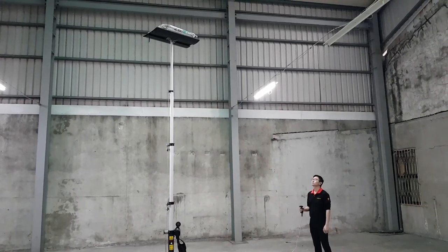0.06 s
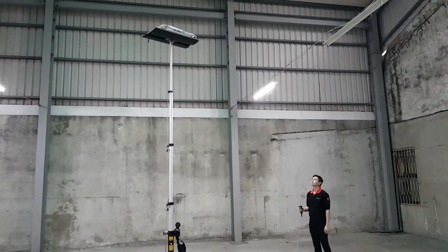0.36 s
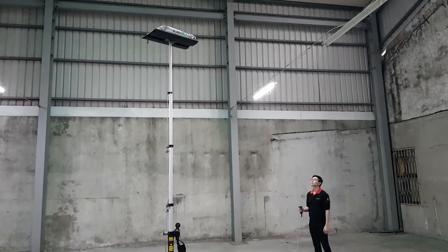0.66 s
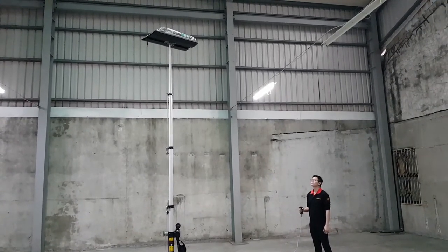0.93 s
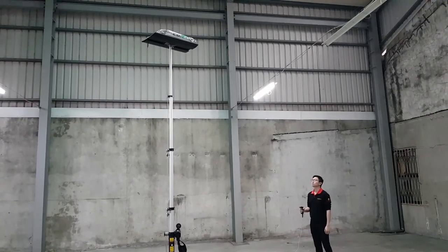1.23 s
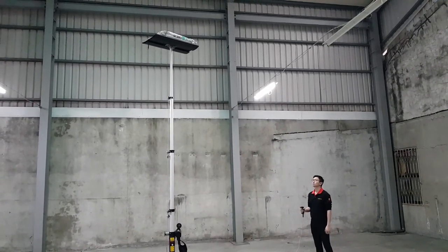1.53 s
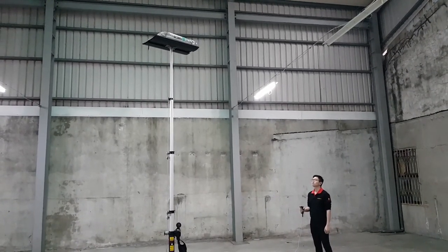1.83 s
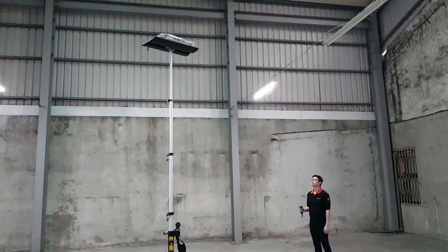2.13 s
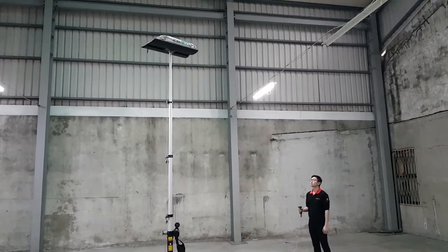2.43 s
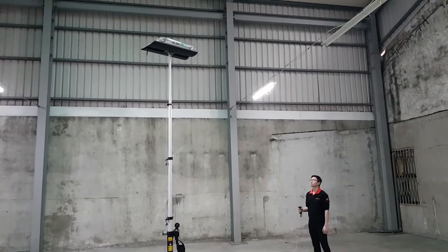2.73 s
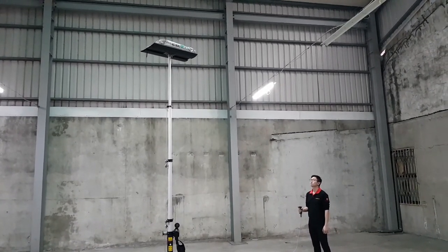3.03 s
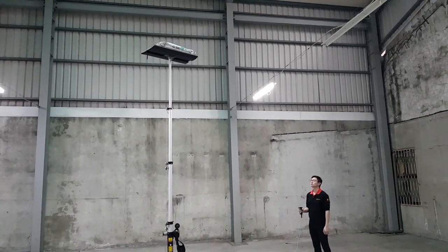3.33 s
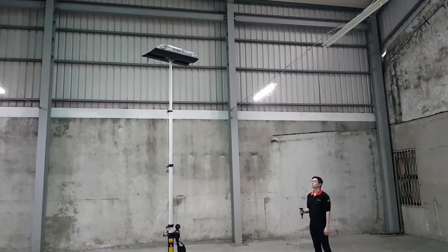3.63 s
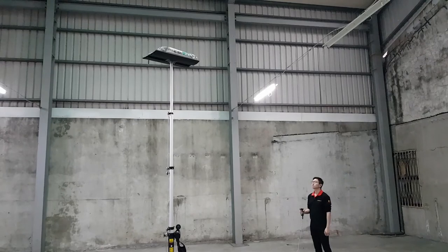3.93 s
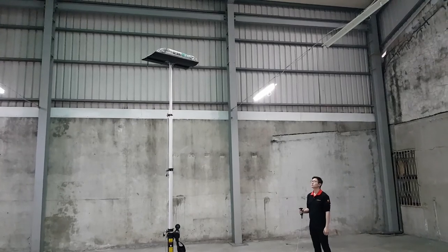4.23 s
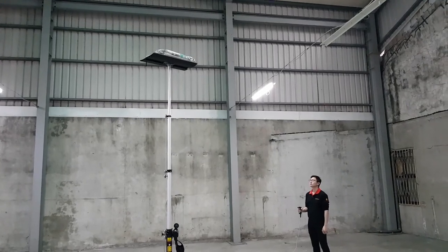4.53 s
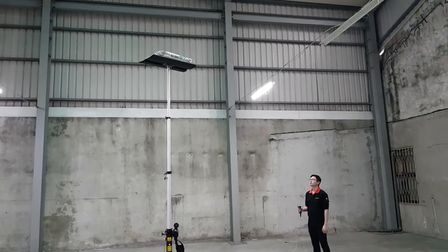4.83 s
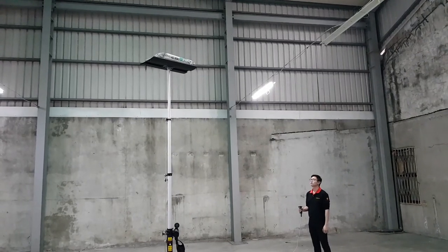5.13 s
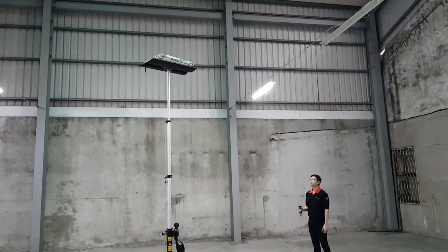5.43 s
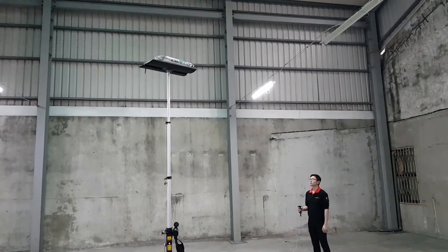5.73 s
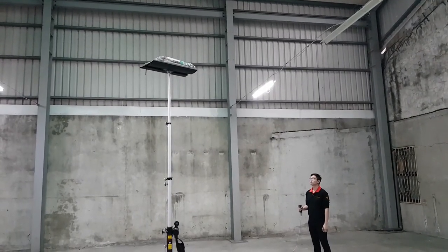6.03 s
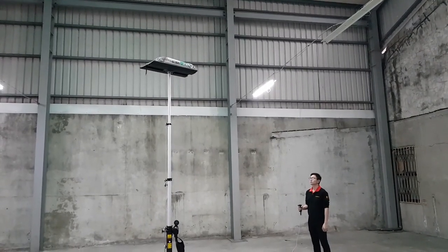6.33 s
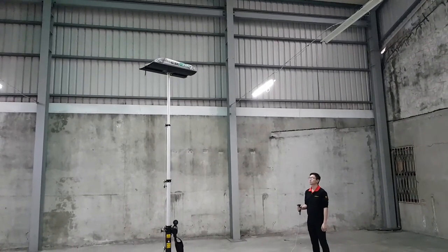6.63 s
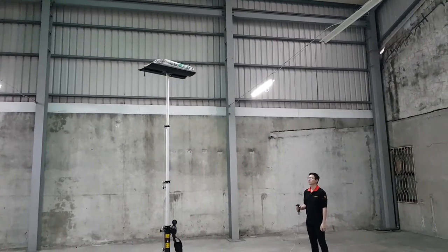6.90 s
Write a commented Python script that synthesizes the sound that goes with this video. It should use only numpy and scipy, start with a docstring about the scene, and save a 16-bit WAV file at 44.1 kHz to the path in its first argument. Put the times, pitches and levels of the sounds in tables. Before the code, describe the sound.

After a moment of quiet room air, an electric winch switches on and climbs quickly to a piercing whine as it lowers a telescopic mast. Its gears rush and hiss, while the sliding mast adds a faint drone and two soft, dull bumps. The whine holds, swelling and fading differently in each ear in the large, echoing warehouse, then falls in pitch as the motor slows near the end.

```python
"""An electric winch lowers a lighting mast in a large, empty warehouse.
First there is only air, rumble and hum. The motor switches on and climbs to a piercing whine; its
gears rush along, its housing hisses and rings, and the sliding mast drones and bumps twice.
At full speed the hall's echoes make the whine swell and fade differently at each ear.
Near the end the motor slows, and the hall smears the falling whine into a tail."""
import sys
import numpy as np
from scipy import signal
from scipy.fft import rfft, irfft, next_fast_len
from scipy.io import wavfile
from scipy.ndimage import map_coordinates

SR = 44100
rng = np.random.default_rng(int(sys.argv[2]) if len(sys.argv) > 2 else 0)


def wav_out(sig):
    """Save sig, one row per channel (or a flat mono array), as 16-bit PCM at SR to the path in sys.argv[1]."""
    wavfile.write(sys.argv[1], SR, np.round(np.clip(np.atleast_2d(sig).T, -1, 1) * 32767).astype(np.int16))


N = 311346
TIME = np.arange(N) / SR
FFT_SIZE = next_fast_len(N, real=True)
FREQS = np.fft.rfftfreq(FFT_SIZE, 1 / SR)
SWITCH_ON_S, TOP_HZ = 0.45, 4213.4


def motor_pitch():
    """Pitch of the whine in Hz: the motor runs up toward top speed, then is eased back twice."""
    # quick, middling and slow stages of closing the gap to top speed: gap_hz, settle_s
    run_up = [(1480, .093), (2069, .36), (247, 1.326)]
    # the two slow-downs: start_s, first_fall_hz_per_s, settle_s
    slow_downs = [(5.53, 1168, .915), (6.48, 1400, 8)]
    gap = sum(hz * np.exp(-since(SWITCH_ON_S) / settle) for hz, settle in run_up)
    sag = sum(fall * settle * (1 - np.exp(-since(start) / settle)) for start, fall, settle in slow_downs)
    return TOP_HZ - gap - sag


def motor_gain(pitch, top_db, speed_power, load_db, attack_s, load_halved_s=0.9117):
    """A motor noise sets in at switch-on, grows with speed and is louder under the strain of starting."""
    age = since(SWITCH_ON_S)
    fade_in = 1 - np.exp(-age / attack_s)
    load = 1 / (1 + (age / load_halved_s) ** 3)
    return fade_in * (pitch / TOP_HZ) ** speed_power * from_db(top_db + load_db * load)


def whine(pitch, strength, jitter_rad=0.15405, rough_rad=0.5194, shimmer_db=0.5, steady_share=0.5651):
    """The motor turns a little unevenly and sings one strong tone, with a wall echo and a long tail."""
    phase = 2 * np.pi * np.cumsum(pitch) / SR + jitter_rad * flutter(44.04)
    left_lead_rad = (0.3872 + 0.45 * flutter(4)) * np.array([[1], [0]])
    direct = strength * np.sqrt(2) * np.sin(phase + left_lead_rad) * whine_at_ears(pitch)
    direct *= from_db(shimmer_db * np.array([flutter(41.2), flutter(23.9)]))
    into_hall = strength * np.sqrt(2) * np.sin(phase + rough_rad * flutter(16.04))
    echo = from_db(-21.5) * np.array([delayed(into_hall, 0.03), delayed(into_hall, 0.029)])
    tail = hall(into_hall) * from_db([[-4.0], [-4.5]])
    # echoes blend into a steady tone, but in a glide they stand out at the older pitch
    apart = np.tanh(np.abs(pitch - delayed(pitch, 0.3)) / 70)
    return direct + (echo + tail) * (steady_share + (1 - steady_share) * apart)


def whine_at_ears(pitch, fade_db=2.5, fade_span_hz=30.122, drift_per_s=3.9787):
    """Gain at each ear: the hall's standing waves swell and fade the whine. It also dips briefly."""
    # how well each pitch carries to the ears: pitch_hz, left_db, right_db
    carry = [(1997, -11, -16), (2647.1, 4.5, -1), (2885.6, -1.5, -8), (3295.8, 5, -10.5), (3526, -1, -8),
             (3777.7, 1, 2), (3992, -6, -0.5), (4211.8, -13.5, 1), (4176.8, -10, 4.5)]
    # slow swelling of the whine: time_s, left_db, right_db
    swell = [(1.95, -5, -2), (2.35, 1.5, 1.5), (3.5, 2, -1), (3.8, 1, -1), (4.35, 3.5, 0.5), (4.75, 1, 2.5),
             (5.0, 10.5, -6.5), (5.2, -11, 0), (5.5, -7, 0.5)]
    # moments when the whine briefly dips: middle_s, half_length_s, depth_db
    dips = [(.6, .022, -12), (0.707, 0.02423, -11.5), (0.902, 0.0274, -10), (2.579, 0.05417, -18.5),
            (2.746, 0.10256, -10.5), (3.21, 0.04355, -6.5), (3.343, 0.02521, -19.5), (3.582, 0.0461, -4),
            (3.906, 0.03973, -14.5), (4.581, 0.04158, -11.5), (6.847, 0.0787, -12.5)]
    carry_hz, *ears_db = np.transpose(carry)
    carry_db = np.array([np.interp(pitch, carry_hz, ear) for ear in ears_db])
    step_hz = np.abs(np.gradient(pitch))
    # loud and quiet spots pass by as the pitch moves and the mast sinks
    fades_passed = np.cumsum(step_hz) / fade_span_hz + drift_per_s * TIME
    pattern = rng.standard_normal((2, 512))
    fades = np.array([map_coordinates(ear, [fades_passed], order=3, mode="wrap") for ear in pattern])
    gliding = np.tanh(step_hz * SR / 200)
    dips_db = sum(db * np.exp(-((TIME - middle) / half) ** 2) for middle, half, db in dips)
    return from_db(carry_db + fade_db * gliding * fades + dips_db + in_time(swell))


def gear_rush(pitch, strength):
    """The gears make a broad rush just under the whine and a narrow rasp around it."""
    rush = strength * noise_around(0.92 * pitch, width_hz=600)
    rasp = strength * noise_around(pitch, width_hz=230)
    rush_at_ears = hall(rush) * from_db(-16)
    rasp_at_ears = (0.3298 * rasp + 1.0207 * hall(rasp)) * from_db([[-12], [-9]])
    return rush_at_ears + rasp_at_ears


def gearbox_ring(pitch):
    """The gearbox rings as the gears come up to speed."""
    # its ringing notes: pitch_hz, width_hz, left_db, right_db
    notes = [(3279.9, 304.8, -14, -30), (3844.2, 292.2, -13.5, -8)]
    gain = motor_gain(pitch, top_db=-15, speed_power=2.5, load_db=6.5, attack_s=0.1582)
    return gain * diffuse_noise(resonances(notes))


def shaft_hum(pitch, strength):
    """The shaft adds a low, unsteady note at a sixth of the whine's pitch."""
    return from_db(-38.5) * strength * noise_around(pitch / 6, width_hz=14)


def friction_hiss(pitch, flicker_db=0.6493, split_hz=6000, bass_edge_hz=190):
    """Rubbing parts and gears hiss, and the housing colours the sound."""
    # tone colour of the hiss: pitch_hz, left_db, right_db
    hiss_colour = [(249.9, -72.5, -77.5), (489, -75.5, -81), (654.85, -60.5, -62.5), (1034.6, -63.5, -64.5),
                   (1672.8, -60.5, -64.5), (2898, -58, -62), (4201, -60, -57.5), (6969.8, -64, -66),
                   (7440.3, -67.5, -70), (9997, -70, -76), (12303, -74, -73), (13800, -81, -78),
                   (15500, -82, -76.5)]
    # pitches at which the housing rings: pitch_hz, width_hz, left_db, right_db
    housing = [(720.33, 60.1, -44.5, -44), (763.38, 15.57, -41, -50), (1290.2, 194.1, -35.5, -37),
               (1981.1, 247.3, -36.5, -34), (2547.5, 204.2, -32.5, -31.5), (3711.5, 411.7, -29, -29.5),
               (5074.6, 65.8, -45.5, -53), (7115.9, 325, -35.5, -35.5), (9167.5, 131.5, -44.5, -55.5),
               (11199, 278.4, -42.5, -53.5)]
    colour = np.hypot(from_db(in_frequency(hiss_colour)), resonances(housing))
    colour *= FREQS ** 2 / (FREQS ** 2 + bass_edge_hz ** 2)   # a small housing gives off little bass
    low_share = 1 / (1 + (FREQS / split_hz) ** 4)
    gears = diffuse_noise(colour * np.sqrt(low_share))
    gears *= motor_gain(pitch, top_db=0.092, speed_power=0.9905, load_db=5.055, attack_s=0.04636)
    treble = diffuse_noise(colour * np.sqrt(1 - low_share))
    treble *= motor_gain(pitch, top_db=0.71, speed_power=1.2, load_db=5.7, attack_s=0.02)
    return from_db(flicker_db * flutter(32.12)) * (gears + treble)


def drive_squeal(pitch, below_hz=3689, edge_hz=174.2, rise_db=5.5):
    """The drive squeals thinly, most of all when it turns slowly and under strain."""
    # its high notes: pitch_hz, width_hz, left_db, right_db
    notes = [(8773.6, 64.8, -35, -43), (9177.5, 220.4, -37, -44.5), (11499, 299.4, -41, -50),
             (7190.8, 141, -37, -42)]
    slow = (1 + np.tanh((below_hz - pitch) / edge_hz)) / 2
    gain = motor_gain(pitch, top_db=-10.8, speed_power=0.3, load_db=8.8, attack_s=0.07)
    return gain * from_db(rise_db * slow) * diffuse_noise(resonances(notes))


def housing_rings():
    """Now and then the drive sets the housing singing on one wavering note."""
    # spells of singing: start_s, length_s, pitch_hz, level_db
    rings = [(.98, .13, 778, -37), (2.2, .95, 697, -44.5), (4.5, 1.9, 764, -48)]
    return sum(from_db(db) * spell(start, length) * noise_around(np.full(N, hz), width_hz=14)
               for start, length, hz, db in rings)


def mast(drone_hz=231, rest_db=-66):
    """Once the winch is on, the sliding mast drones in spells and soft knocks set it booming."""
    # dull knocks: start_s, level_db, fade_s (time to fall by 60 dB)
    bumps = [(1.151, -42.5, 0.403), (4.371, -39, 0.887)]
    # notes the knocks ring with: pitch_hz, width_hz, left_db, right_db
    notes = [(119.96, 30.47, -6.5, -5), (235.04, 59.9, -3.5, -2.5), (329.8, 72.2, -11, -12.5)]
    # spells of droning: start_s, length_s, level_db
    drones = [(0.449, 0.3926, -48.5), (4.35, 1.1941, -51), (6.6, 0.2975, -51.5)]
    spells = sum(from_db(db) * spell(start, length) for start, length, db in drones)
    drone = np.hypot(spells, from_db(rest_db)) * noise_around(np.full(N, drone_hz), width_hz=14)
    knocks = sum((TIME >= start) * from_db(db - 60 * since(start) / fade) for start, db, fade in bumps)
    return (TIME > SWITCH_ON_S) * (knocks * diffuse_noise(resonances(notes)) + drone)


def hall(sound, build_s=0.01919, fade_60_db_s=2.3756):
    """Countless echoes build up and die away, different at each ear."""
    t = TIME[:2 * SR]
    tail = rng.standard_normal((2, len(t))) * from_db(-60 * t / fade_60_db_s) * (1 - np.exp(-t / build_s))
    tail /= np.sqrt(np.sum(tail ** 2, axis=1, keepdims=True))
    return signal.fftconvolve(sound[None], tail, axes=1)[:, :N]


def background(air_db=-37, bass_edge_hz=120, waver_db=1.4047):
    """The building's own sound: steady air, a shifting rumble and a faint hum."""
    # tone colour of the air: pitch_hz, relative_db
    air_colour = [(25, -10.5), (60, -3.5), (200, -2.5), (450, -1), (1300, 0), (3500, -5.5), (7000, -13),
                  (8300, -26), (12000, -24.5), (15500, -46)]
    # tone colour of the rumble: pitch_hz, relative_db
    rumble_colour = [(25, -18.5), (55, -3.5), (80, -7), (120, 3.5), (170, -1.5), (240, -1.5), (400, -4.5),
                     (900, -27)]
    # loudness of the rumble: time_s, level_db
    rumble_level = [(0, -47.5), (.5, -42), (1.15, -43.5), (1.3, -56), (5.8, -59.5), (7.06, -52.5)]
    # notes of the hum: pitch_hz, width_hz, left_db, right_db
    hum_notes = [(57.91, 5.93, -62.5, -72.5), (118.76, 6.105, -59, -61), (314.16, 32.53, -55, -56.5)]
    bass_cut = FREQS / np.hypot(FREQS, bass_edge_hz)
    air = from_db(air_db) * unit_power(diffuse_noise(from_db(in_frequency(air_colour)) * bass_cut))
    rumble_gain = from_db(in_time(rumble_level) + waver_db * flutter(6))
    rumble = rumble_gain * unit_power(diffuse_noise(from_db(in_frequency(rumble_colour))))
    return air + rumble + diffuse_noise(resonances(hum_notes))


def diffuse_noise(colour):
    """Noise from all around with the given gain at each pitch, much alike at both ears in the bass."""
    # how alike the two ears hear it: pitch_hz, likeness (0 unrelated, 1 the same)
    likeness = [(60, 0.716), (150, 0.9086), (300, 0.6914), (650, 0.5565), (1300, 0), (3000, 0.3437),
                (6500, 0.0825), (14000, 0.059)]
    alike = in_frequency(likeness)
    mid, side = rfft(rng.standard_normal((2, FFT_SIZE)))
    ears = np.sqrt(1 + alike) * mid + np.sqrt(1 - alike) * side * [[1], [-1]]
    return irfft(ears * colour * np.sqrt(SR) / 2, FFT_SIZE)[:, :N]


def resonances(notes):
    """Tone colour of a ringing thing at each ear: one peak per note, each with its own total level."""
    power = 0
    for hz, width, *ears_db in notes:
        peak = 1 / (1 + ((FREQS - hz) / width * 1.3) ** 2) ** 2
        power = power + from_db(ears_db)[:, None] ** 2 * peak / (peak.sum() * SR / FFT_SIZE)
    return np.sqrt(power)


def noise_around(hz, width_hz):
    """A band of noise whose centre follows a pitch."""
    phase = 2 * np.pi * np.cumsum(hz) / SR
    return unit_power(flutter(width_hz / 2) * np.cos(phase) + flutter(width_hz / 2) * np.sin(phase))


def flutter(rate_hz):
    """Random wavering up to a given rate, about 1 in size."""
    low_pass = signal.butter(2, rate_hz, fs=SR, output="sos")
    return unit_power(signal.sosfilt(low_pass, rng.standard_normal(N + SR))[SR:])


def spell(start_s, length_s, attack_s=0.1, release_s=0.14):
    """Gain of a note that builds, holds and dies away."""
    return np.minimum(since(start_s) / attack_s, 1) * np.exp(-since(start_s + length_s) / release_s)


def since(start_s):
    """Seconds since a moment, zero before it."""
    return np.maximum(TIME - start_s, 0)


def delayed(x, delay_s):
    """The same signal arriving later."""
    return np.interp(TIME - delay_s, TIME, x, left=0)


def in_time(rows):
    """Join a table's points into curves over time."""
    times, *columns = np.transpose(rows)
    return np.array([np.interp(TIME, times, column) for column in columns])


def in_frequency(rows):
    """Join a table's points into curves over pitch, with octaves evenly spaced."""
    hz, *columns = np.transpose(rows)
    return np.array([np.interp(np.log(FREQS + 1), np.log(hz), column) for column in columns])


def from_db(db):
    """Turn decibels into gain."""
    return 10 ** (np.asarray(db) / 20)


def unit_power(x):
    """Scale to an average power of 1."""
    return x / np.sqrt(np.mean(np.abs(x) ** 2) + 1e-20)


def scene():
    """The winch's noises follow its speed and load; the mast and the building sound along."""
    pitch = motor_pitch()
    strength = motor_gain(pitch, top_db=-14.5, speed_power=2.5, load_db=6.5, attack_s=0.0568)
    motor = gearbox_ring(pitch) + whine(pitch, strength)
    motor += gear_rush(pitch, strength) + shaft_hum(pitch, strength)
    friction = friction_hiss(pitch) + drive_squeal(pitch)
    return motor + friction + mast() + background() + housing_rings()


def record(dry, cutoff_hz=15900):
    """Clip any peaks at full scale and cut the highest treble."""
    low_pass = 1 / np.sqrt(1 + (FREQS / cutoff_hz) ** 400)
    return irfft(rfft(np.clip(dry, -1, 1), FFT_SIZE) * low_pass, FFT_SIZE)[:, :N]


dry = scene()
out = record(dry)
wav_out(out)
```